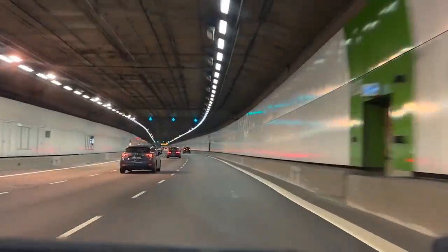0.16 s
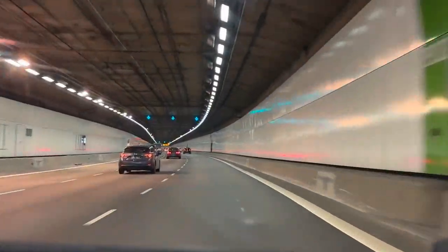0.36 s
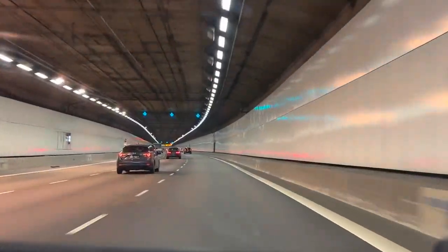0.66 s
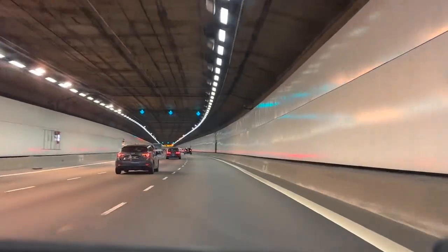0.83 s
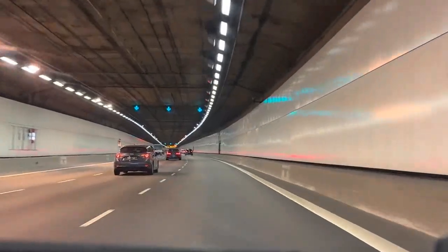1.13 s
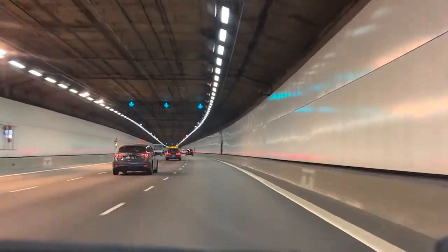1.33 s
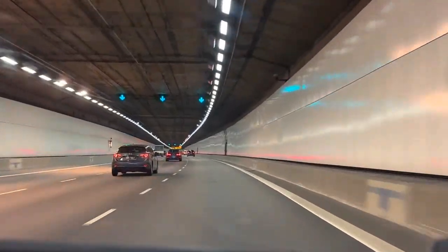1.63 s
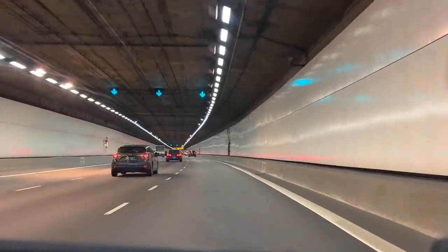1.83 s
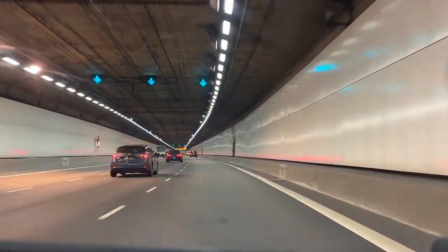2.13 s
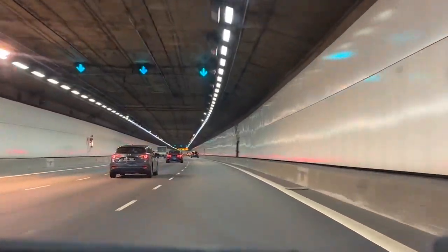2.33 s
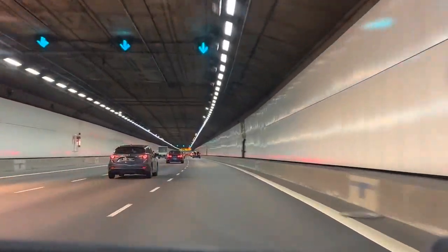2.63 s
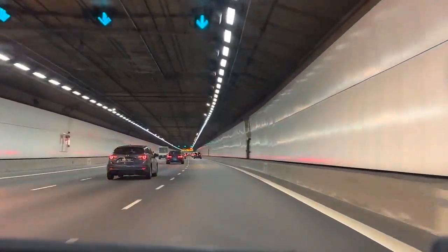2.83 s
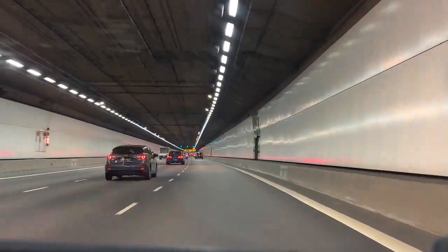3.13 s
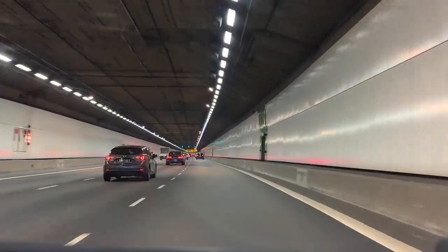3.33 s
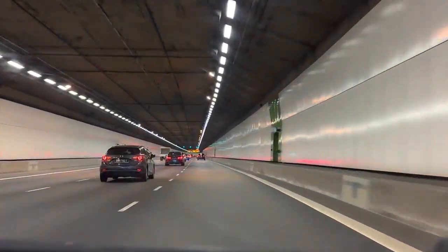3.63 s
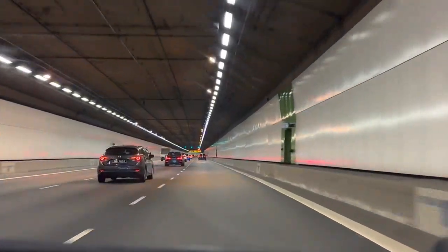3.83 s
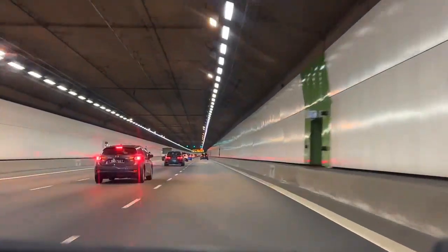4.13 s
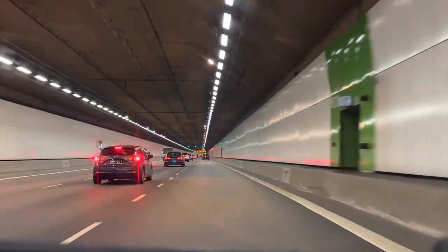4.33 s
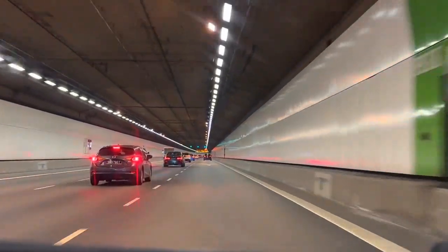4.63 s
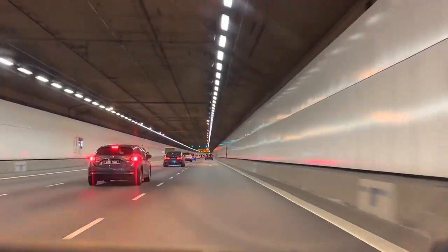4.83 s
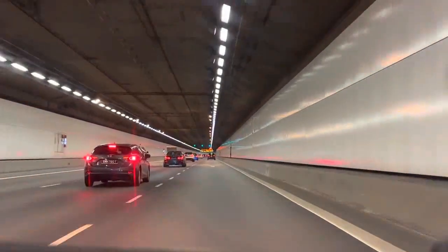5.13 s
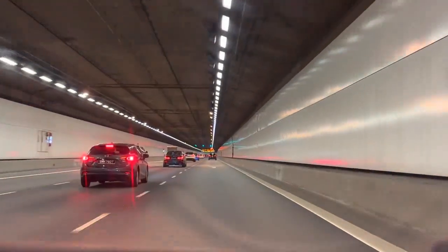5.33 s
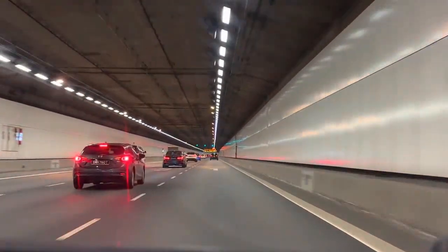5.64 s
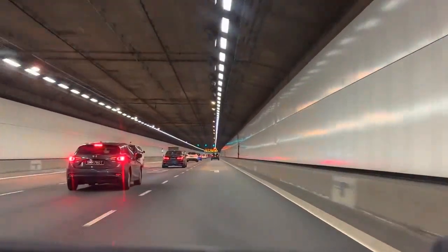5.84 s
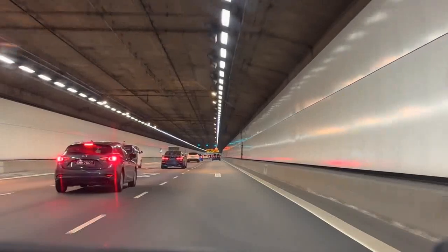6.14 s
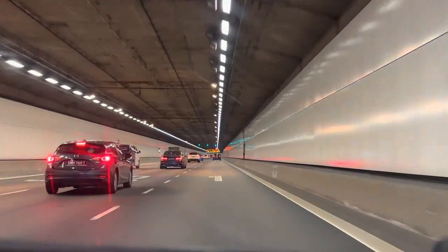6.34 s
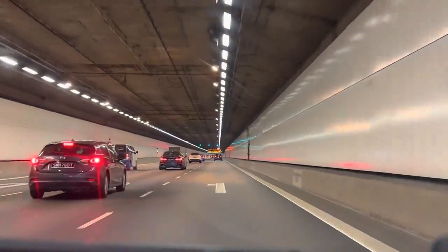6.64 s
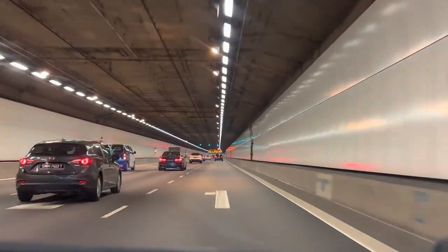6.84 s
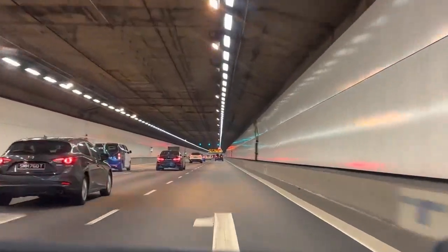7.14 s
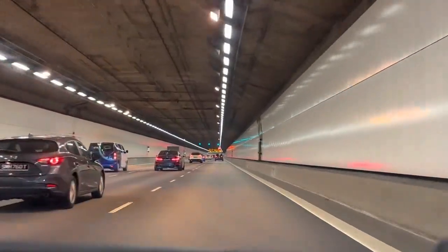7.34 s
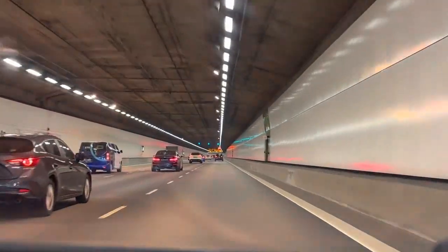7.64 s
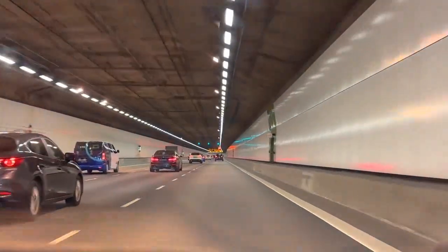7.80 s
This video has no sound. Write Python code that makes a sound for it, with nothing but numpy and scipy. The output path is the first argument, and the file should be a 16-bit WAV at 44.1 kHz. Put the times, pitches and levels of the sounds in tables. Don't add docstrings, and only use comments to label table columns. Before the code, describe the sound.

Inside a car cruising through a road tunnel, heard from a phone on the dashboard. From 0 s a deep, bass-heavy rumble fills the cabin: body boom swelling and dipping, panels drumming with road grain, a very low wheel hum and a wavering engine drone. Tyre roar from the walls is smooth and much quieter; vent hiss and a thin, very high trim buzz are faint. Muffled joint thuds come irregularly from the start to about 4.1 s, several fairly firm, with a tight group near 4 s. The buzz drops sharply at 4.2 s and soon creeps back. Bumps are sparser and softer from 4.9 to 6 s, with coarse drumming gusts around 4.8-5.2 s and tiny plastic ticks near 4.95, 5.1 and 5.9 s. Bumps firm up after 6.2 s. From 7.1 to 7.6 s harder thuds crowd together, then the rumble continues to the end, just before 8 s, the buzz fading.

```python
import sys
import numpy as np
from scipy import signal
from scipy.fft import rfft, irfft, next_fast_len
from scipy.io import wavfile
from scipy.ndimage import uniform_filter1d

SR = 44100
rng = np.random.default_rng(int(sys.argv[2]) if len(sys.argv) > 2 else 0)


def to_wav(s):
    ch = np.atleast_2d(s).T
    pcm = np.round(np.clip(ch, -1, 1) * 32767)
    wavfile.write(sys.argv[1], SR, pcm.astype(np.int16))


def nominal_scale(level):
    x = np.asarray(level, float) / 20
    return 10 ** x


N = 351477
TIME = np.arange(N) / SR
SIZE = next_fast_len(N + SR)
FREQ = np.arange(SIZE // 2 + 1) * SR / SIZE

# t/s, peak level/dB, panel ring f/Hz, upper ring level/dB
JOINTS = [(0.077, -7, 170, -17), (0.391, -18, 270, -1), (0.519, -9, 242, -16), (0.543, -9.5, 255, -15.5),
          (0.813, -7, 169, -19.5), (1.09, -11, 228, -15), (1.488, -15.5, 169, -17), (1.785, -9, 173, -13),
          (2.13, -10, 175, -20), (2.449, -10.5, 181, -15), (2.603, -13, 215, -17), (2.805, -8, 214, -25),
          (3.249, -10.5, 185, -16), (3.427, -8, 174, -17), (3.732, -18, 267, -11), (3.943, -13, 172, -9.5),
          (4.003, -7.5, 198, -13), (4.088, -9.5, 168, -16), (4.888, -18, 258.4, -8), (5.22, -15, 186, -18),
          (5.939, -16, 172, -7), (6.275, -10, 170, -10.5), (6.455, -9, 172, -13), (6.941, -12, 227, -6),
          (7.086, -4, 149, -21), (7.194, -6.5, 220, -12), (7.274, -10.5, 187, -19), (7.419, -4.5, 199, -9),
          (7.555, -9, 185, -7), (7.637, -8.5, 210, -14)]
# t/s, drumming change/dB
ROAD_STRIPS = [(.84, 2), (2.86, -1.5), (2.93, 2), (3.95, 4), (4.1, 4), (4.82, 7), (4.87, -3.5), (4.95, 2.5),
               (5.05, 4), (5.16, -3), (5.53, 3.5), (5.93, 2.5), (6.16, -5.5), (6.2, 3.5), (7.35, 0.5),
               (7.5, -1), (7.69, -3.5), (7.85, 1.5)]
# t/s, boom change/dB, half length/s
ROAD_WAVES = [(0.062, 4.5, 0.032), (0.528, 7.5, 0.029), (0.652, -8.5, 0.044), (0.773, -0.5, 0.054),
              (0.987, 5.5, .04), (1.15, -6, 0.023), (1.2, 3.5, 0.032), (1.495, 3, 0.1), (1.8, 1, .04),
              (2.2, 1, .05), (2.45, 7, 0.033), (2.57, -4.5, 0.057), (2.77, 2, 0.069), (2.858, 6, .04),
              (2.985, -11.5, 0.023), (3.363, -7, 0.033), (4.232, -4.5, 0.017), (4.326, 5.5, 0.058),
              (4.553, 4, 0.035), (4.817, 7.5, 0.028), (5.003, 5.5, .04), (5.121, 7.5, 0.026),
              (5.197, -5.5, .05), (5.48, 3, 0.067), (6.005, 7, 0.072), (6.123, 7, 0.021), (6.362, 8, .05),
              (6.947, 5, 0.034), (7.19, 4.5, .03), (7.42, -6, 0.028)]
# f/Hz, level/dB per Hz
BOOM_SPECTRUM = [(22, -40), (30, -20), (42, -2), (52, -5), (63, -3), (76, 1), (95, -5.5), (125, -17)]
# f/Hz, level/dB per Hz
DRUM_SPECTRUM = [(70, -11), (100, -1.5), (130, -1), (160, -5), (220, -8), (300, -12.5), (400, -20),
                 (520, -26), (600, -38)]
# f/Hz, level/dB per Hz
ROAR_SPECTRUM = [(400, -4.5), (560, -1), (720, -0.5), (950, -3), (1250, -8), (1450, -12.5), (2100, -14.5),
                 (2220, -12), (2450, -14), (2650, -17.5), (3200, -21.5), (3500, -24), (3850, -33),
                 (4500, -40)]
BOOM_DB, DRUM_DB, ROAR_DB = -21, -21.5, -42
STRIP_CROSSING_S = 0.034
THUD_DB = -9.5

# t/s, wheel hum level/dB, engine drone f/Hz, engine drone level/dB
DRIVELINE = [(0, -25, 62.4, -15), (.6, -26.5, 62.04, -21.5), (.9, -27, 61.52, -18), (1.62, -35, 60.8, -15),
             (1.8, -34, 60.18, -28.5), (2.2, -34, 60.53, -19), (2.5, -25.5, 60.87, -24),
             (3, -31, 60, -24.5), (3.6, -30, 59.1, -21), (4, -27.5, 61.2, -35), (4.5, -25.5, 62.2, -26),
             (5.1, -39, 63.2, -20.5), (5.2, -28, 59.1, -25.5), (5.5, -33, 58.07, -18),
             (6, -26.5, 63.05, -24), (6.5, -24, 63.6, -21.5), (7.1, -27.5, 62.4, -27),
             (7.97, -25, 62.2, -25)]
HUM_START_HZ, HUM_CRUISE_HZ, SLOWING_S = 37.9, 35.9, 3.4

# f/Hz, width/Hz, level/dB
LOOSE_PART_MODES = [(9243, 156, 1.5), (9570, 120, -6), (9700, 90, -13.5), (10100, 120, -23),
                    (10300, 260, -22.5), (10800, 110, -21), (11030, 50, -16), (11270, 160, -14),
                    (12200, 400, -29)]
# t/s, drop/dB, loosening time/s
TRIM_SEATINGS = [
    (.02, 3, .5),
    (.62, 4, 1.6),
    (3.24, 5, 0.69),
    (4.23, 14, 0.26),
    (4.55, 7, 0.24),
    (5.95, 4, .3),
    (6.39, 8, 1.5),
    (7.84, 11.5, 1.5),
]
# t/s, buzz change/dB
TRIM_JOLTS = [(0, 0), (.18, 7.5), (.51, 0.5), (.94, 3.5), (1.04, -3.5), (1.71, 3.5), (2.0, 4), (2.55, 2),
              (3.14, 2.5), (3.79, 6.5), (4.07, 5), (4.32, -5.5), (4.95, -7.5), (5.07, 4), (5.15, -4),
              (5.44, 5.5), (5.73, 8), (6.06, 3.5), (6.35, 3.5), (6.42, -2), (6.53, 8.5), (7.64, -5.5),
              (7.76, 3.5)]
LOOSE_DB, JOLT_S = -55.5, 0.02

# t/s, peak level/dB
DASH_TICKS = [
    (4.9554, -42),
    (5.113, -48),
    (5.909, -55),
]

# f/Hz, level/dB per Hz
VENT_SPECTRUM = [(3000, -13.5), (4000, 1), (5300, 0), (6300, 3.5), (7300, -2.5), (8000, 3), (8900, -5),
                 (10600, -11), (12400, -20)]
# f/Hz, level/dB per Hz
DIFFUSE_SPECTRUM = [(18, -38.5), (30, -16), (75, 0), (118, -2.5), (258, -10.5), (297, -8.5), (372, -15.5),
                    (554, -15.5), (682, -19), (784, -19), (1030, -23), (1900, -51), (2470, -79),
                    (4180, -120)]
# f/Hz, level/dB per Hz
STRAY_SPECTRUM = [(1800, -5), (2600, -10), (4000, -12.5), (6000, -23), (8300, -21.5), (10500, -24.5),
                  (12400, -32)]
VENT_DB, DIFFUSE_DB, STRAY_DB = -64, -33.5, -78.5

# f/Hz, phase by which left leads/rad
PORT_LEAD = [(0, 0), (1100, .15), (1500, -.14), (2200, .0), (3000, .57), (4200, .55), (5400, .1),
             (6500, .1), (7200, 1.1), (8000, np.pi), (8450, 3.05), (9300, 1.48), (10200, .75), (11400, .25),
             (11900, .02)]
# f/Hz, left minus right level/dB
PORT_LEVELS = [(30, .6), (300, 1.2), (600, 2.2), (1200, 2.1), (1900, 0)]


def unit(x):
    return x / np.sqrt(np.mean(x ** 2))


def curves(table):
    s, *columns = np.transpose(table)
    return [np.interp(TIME, s, c) for c in columns]


def colour(x, points):
    hz, db = np.transpose(points)
    gain = nominal_scale(np.interp(np.log(FREQ + 1), np.log(hz), db, left=-90, right=-90))
    return unit(irfft(rfft(x, SIZE) * gain, SIZE)[:N])


def ring(x, hz, width):
    return signal.lfilter(*signal.iirpeak(hz, hz / width, SR), x)


def walk(rate):
    k = int(SR / rate)
    held = np.repeat(rng.standard_normal(N // k + 1), k)[:N]
    return unit(uniform_filter1d(uniform_filter1d(held, k), k))


def gusty_noise(depth_db, rate):
    return rng.standard_normal(N) * nominal_scale(depth_db * walk(rate))


def humps(times, dbs, half_s):
    ms = np.arange(0, TIME[-1], 1 / 1000)
    total_db = sum(db * np.exp(-((ms - s) / h) ** 2) for s, db, h in np.broadcast(times, dbs, half_s))
    return np.interp(TIME, ms, total_db)


def tone(hz, db, wander, waver_db):
    angle = 2 * np.pi * np.cumsum(hz * (1 + wander * walk(4))) / SR
    return np.sqrt(2) * nominal_scale(db + waver_db * walk(6.5)) * np.sin(angle)


def road():
    boom = colour(rng.standard_normal(N), BOOM_SPECTRUM)
    swell = uniform_filter1d(uniform_filter1d(boom ** 2, size=SR // 14), size=SR // 14)
    boom = unit(boom / swell ** .4)
    boom = boom * nominal_scale(BOOM_DB + humps(*np.transpose(ROAD_WAVES)))
    drum_db = DRUM_DB + humps(*np.transpose(ROAD_STRIPS), STRIP_CROSSING_S)
    drum = colour(gusty_noise(1.56, 60), DRUM_SPECTRUM) * nominal_scale(drum_db)
    roar = colour(gusty_noise(0.24, 11), ROAR_SPECTRUM) * nominal_scale(ROAR_DB)
    return boom + drum + roar


def bumps():
    out = np.zeros(N + SR)
    t = TIME[:SR // 8]
    knock = (t / .004) ** 2 * np.exp(-t / 0.0026)
    knock = knock / knock.max()
    heave = (t / .008) * np.exp(-t / .008)
    thud = nominal_scale(THUD_DB) * heave / heave.max() * np.sin(2 * np.pi * 105 * t)
    stiff_panel = np.sin(2 * np.pi * 400 * t)
    for s, peak_db, hz, upper_db in JOINTS:
        rings = np.sin(2 * np.pi * hz * t) + nominal_scale(upper_db) * stiff_panel
        start = int(s * SR)
        out[start:start + len(t)] += nominal_scale(peak_db - 3.0) * (knock * rings + thud)
    return out[:N]


def wheels():
    hum_db, drone_hz, drone_db = curves(DRIVELINE)
    hum_hz = np.interp(TIME, [0, SLOWING_S], [HUM_START_HZ, HUM_CRUISE_HZ])
    shake_db = humps(*np.transpose(ROAD_WAVES))
    load_db = 0.71 * (shake_db - uniform_filter1d(shake_db, size=SR // 2))
    hum = tone(hum_hz, hum_db + .3, 0.005, waver_db=2.0)
    drone = tone(drone_hz, drone_db + load_db - .1, 0.0039, waver_db=1.6)
    return hum + drone


def trim():
    shaking = nominal_scale(1.6 * walk(70) + 0.55 * walk(22))
    modes = 0
    for hz, width, db in LOOSE_PART_MODES:
        contacts = gusty_noise(1.0, 50) * shaking
        modes = modes + nominal_scale(db) * ring(ring(contacts, hz, 1.7 * width), hz, 1.7 * width)
    seated_db = 0
    for s, db, loosening in TRIM_SEATINGS:
        seated_db = seated_db + db * (TIME >= s) * np.exp(-np.abs(TIME - s) / loosening)
    return unit(modes) * nominal_scale(LOOSE_DB - seated_db + humps(*np.transpose(TRIM_JOLTS), JOLT_S))


def ticks():
    snaps = np.zeros(N)
    for s, peak_db in DASH_TICKS:
        snaps[int(s * SR)] += nominal_scale(peak_db + 18.5)
        snaps[int((s + .0013) * SR)] += nominal_scale(peak_db + 19.0)
    low = ring(ring(snaps, 4100, 1800), 4100, 2500)
    high = ring(ring(snaps, 5200, 1500), 5200, 2200)
    return low + nominal_scale(-6.0) * high


def vents():
    return colour(gusty_noise(0.41, 15), VENT_SPECTRUM) * nominal_scale(VENT_DB)


def diffuse_field():
    return colour(gusty_noise(1.6, 25), DIFFUSE_SPECTRUM) * nominal_scale(DIFFUSE_DB)


def stray_reflections():
    return colour(gusty_noise(4.0, 16), STRAY_SPECTRUM) * nominal_scale(STRAY_DB)


def scene():
    cabin = road() + bumps() + wheels() + trim() + ticks() + vents()
    diffuse = diffuse_field()
    stray = [stray_reflections() for port in "LR"]
    return np.array([cabin + diffuse, cabin - diffuse]) + stray


def band_limit(x):
    return signal.sosfilt(signal.butter(12, 12420, fs=SR, output="sos"), x)


def record(dry):
    lead = np.interp(FREQ, *np.transpose(PORT_LEAD))
    balance_db = np.interp(FREQ, *np.transpose(PORT_LEVELS))
    half = nominal_scale(balance_db / 2) * np.exp(.5j * lead)
    spread = irfft(rfft(dry, SIZE) * np.array([half, 1 / half]), SIZE)[:, :N]
    return band_limit(spread)


dry = scene()
out = record(dry)
to_wav(out)
```